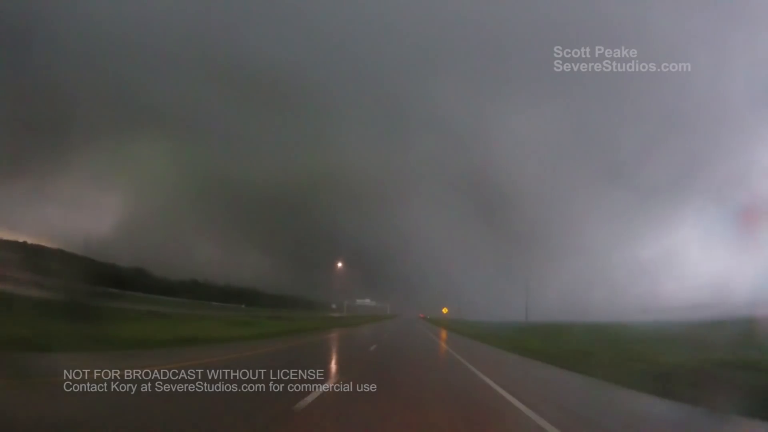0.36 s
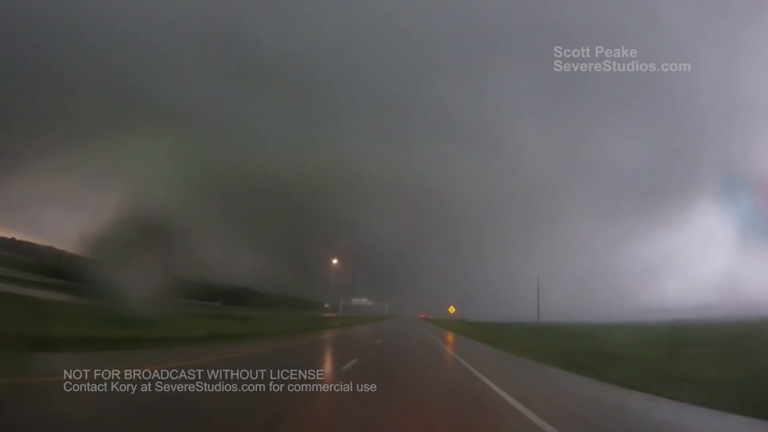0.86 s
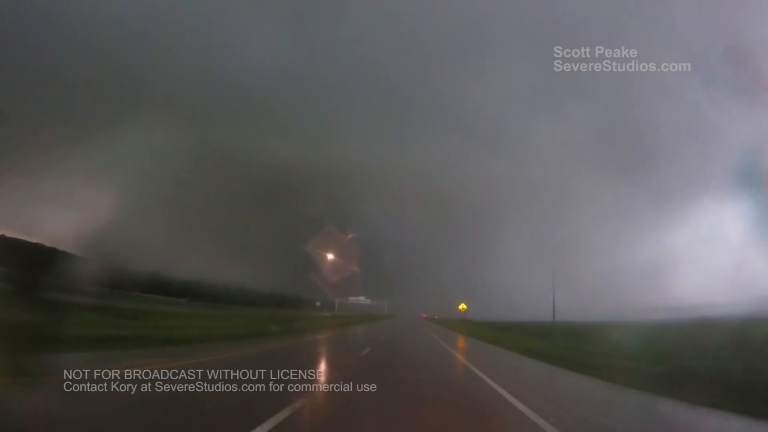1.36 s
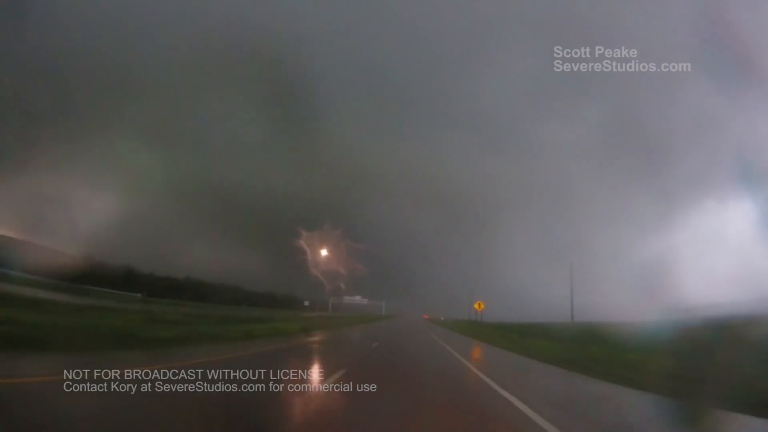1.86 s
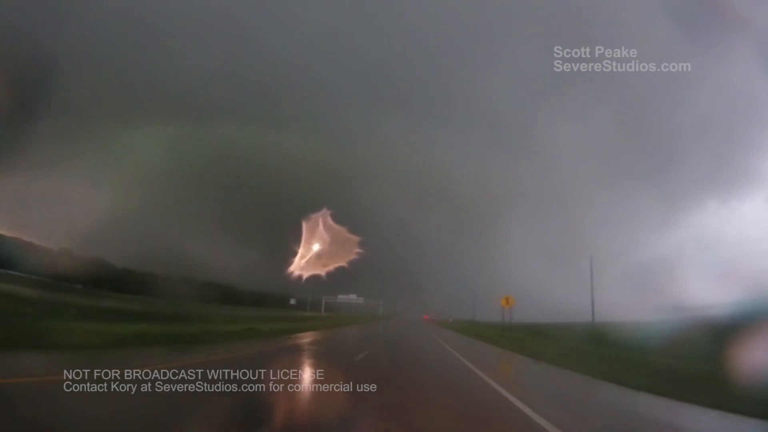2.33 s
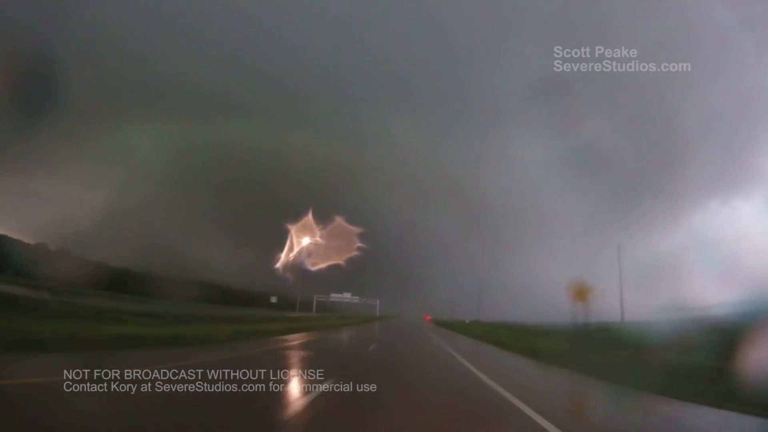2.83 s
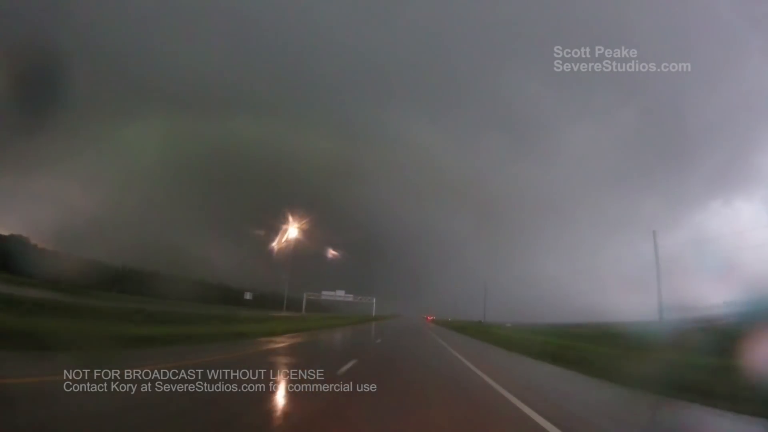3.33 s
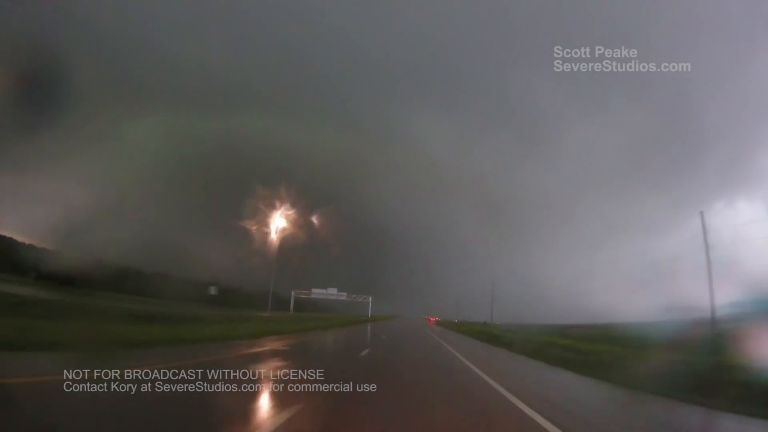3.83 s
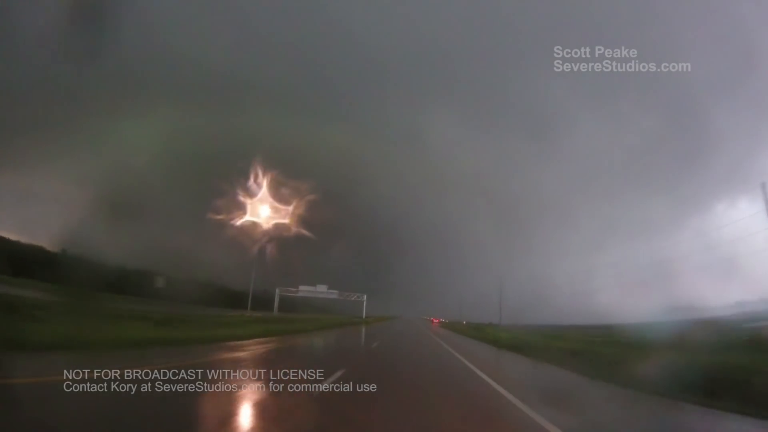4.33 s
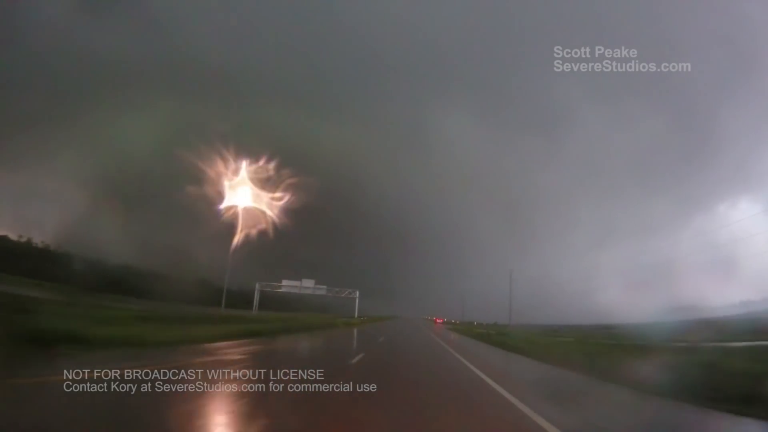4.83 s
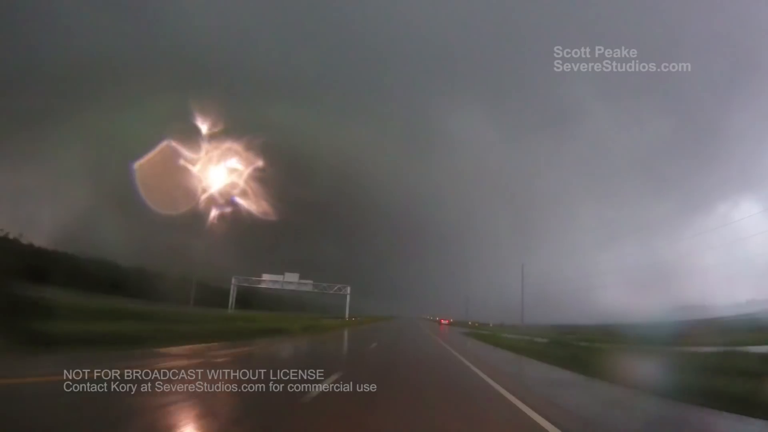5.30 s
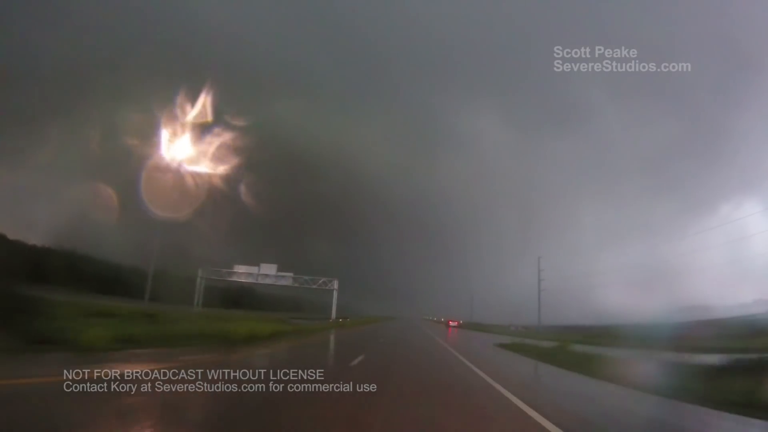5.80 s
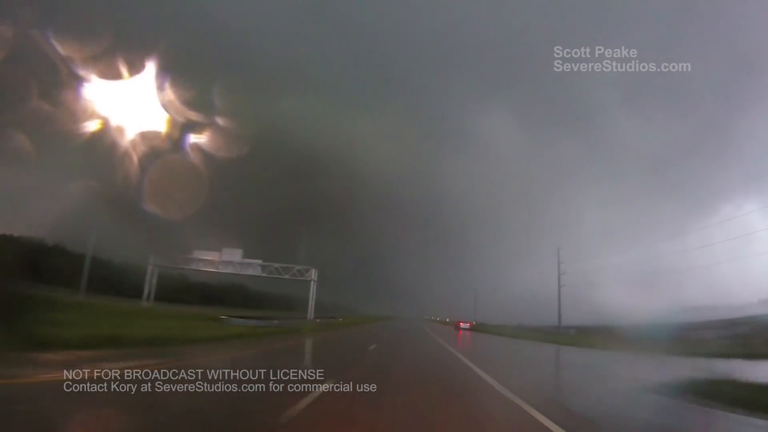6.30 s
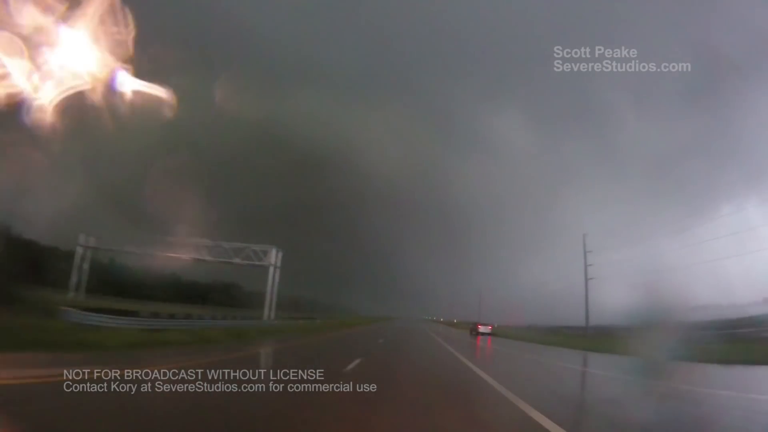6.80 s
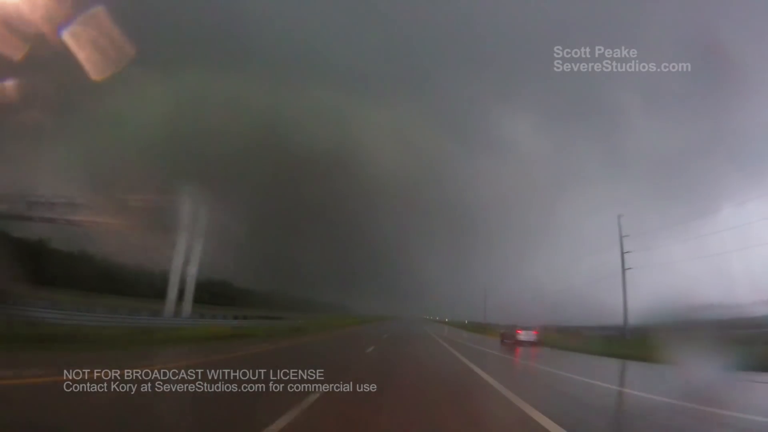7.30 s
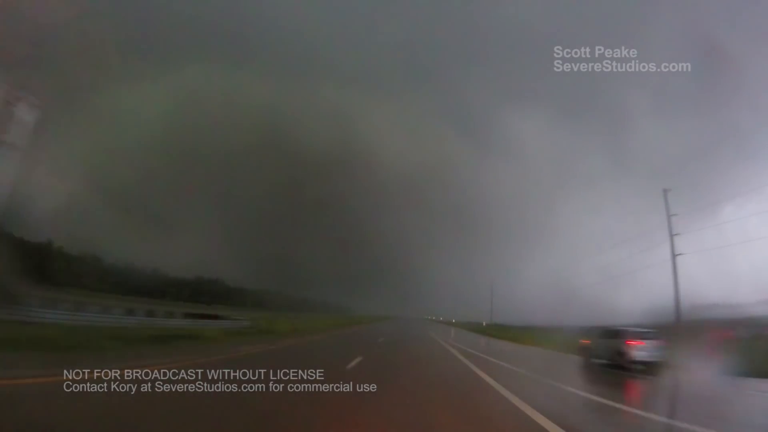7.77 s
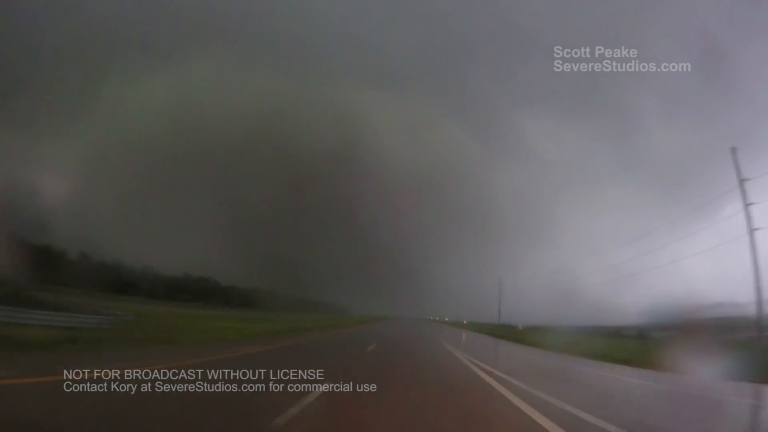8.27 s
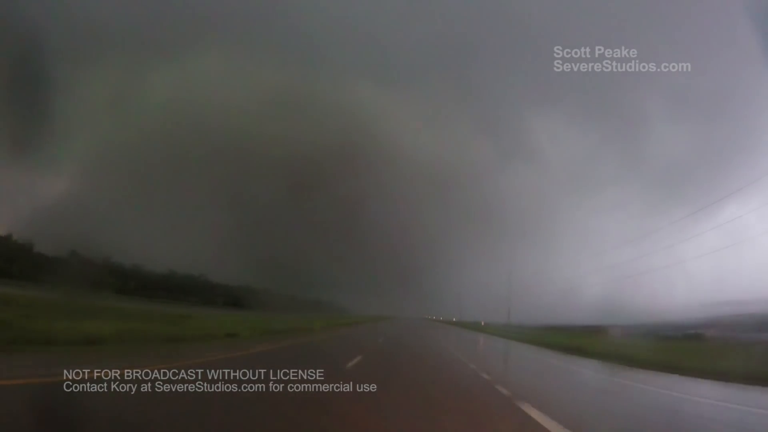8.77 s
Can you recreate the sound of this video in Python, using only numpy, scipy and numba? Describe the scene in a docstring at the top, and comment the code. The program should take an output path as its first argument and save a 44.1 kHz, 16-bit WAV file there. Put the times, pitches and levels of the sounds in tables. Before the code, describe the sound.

Strong wind buffets a microphone on a car driving into a storm, low and rumbling, while raindrops tick, knock and thud on the housing.

```python
"""Wind buffets a microphone in a housing on a car that drives into a storm on a wet road.
The wind is noise in seven pitch ranges that follow gusts, rumble and wetness, each by its own law,
over a thin hiss; eddies roar and rush past the port in bursts, small drops patter as chance clicks.
Large drops tick, knock and thud as short ringing tones, hard ones crack as single clicks, and short
low surges of the wind thump softly. A quick gain control holds the level down."""
import sys
import numpy as np
from scipy import signal
from scipy.fft import rfft, irfft, next_fast_len
from scipy.io import wavfile
from scipy.ndimage import uniform_filter1d
from numba import njit

SR = 44100
rng = np.random.default_rng(int(sys.argv[2]) if len(sys.argv) > 2 else 0)


def generate_wav(signal):
    """Clip the signal to [-1, 1] and save it as 16-bit WAV at the path in sys.argv[1]."""
    frames = np.transpose(np.atleast_2d(signal))
    scaled = np.clip(frames, -1, 1) * 32767
    pcm = np.round(scaled).astype(np.int16)
    wavfile.write(sys.argv[1], SR, pcm)


def convert_level_to_amplitude(level_db):
    """Map a level in decibels to its linear amplitude factor."""
    exponent = np.asarray(level_db, float) / 20
    return 10 ** exponent


N = 392042
T = np.arange(N) / SR


def level(x, db):
    """Scale a sound to an rms level in dB."""
    return x * convert_level_to_amplitude(db) / np.sqrt(np.mean(x ** 2))


def walk(rate):
    """A wandering curve of spread 1: random values, 'rate' per second, joined smoothly."""
    hold = int(SR / rate)
    steps = np.repeat(rng.standard_normal(N // 100), hold)[:N]
    smooth = uniform_filter1d(uniform_filter1d(steps, hold), hold)
    return level(smooth, 0)


def curve(table):
    """Join the points of a two-column table into a value for every sample."""
    t, value = np.transpose(table)
    return np.interp(T, t, value)


def ring(hz, t60, rise):
    """A soft push makes one tone ring and die away by 60 dB in t60 seconds; peak 1."""
    t = np.arange(1024) / SR
    fade = np.exp(-np.log(1000) * t / t60)
    push = 1 - np.exp(-(t / rise) ** 2)
    x = np.sin(2 * np.pi * hz * t) * fade * push
    return x / np.abs(x).max()


# how the housing colours the air noise inside it: (f/Hz, level/dB)
HOUSING_COLOUR = [(15, -29), (30, 0.5), (55, 3), (82, 6.5), (160, -2.5), (300, -11.5), (385, -21),
                  (600, -16), (1000, -40), (1500, -41), (2050, -40.5), (2550, -42.5), (2750, -48.5),
                  (3050, -53), (3700, -60.5), (4750, -66), (5700, -60.5), (7200, -61.5), (8300, -64.5),
                  (10000, -67), (11500, -74.5), (14000, -95)]


def housed(x, lo_hz, hi_hz, order=6):
    """The part of a broad noise between two pitches, ringing on in the housing; rms 1."""
    size = 2 * next_fast_len(N // 2 + 1)
    hz = np.arange(1, size // 2 + 2) * SR / size
    colour_hz, colour_db = np.transpose(HOUSING_COLOUR)
    colour = convert_level_to_amplitude(np.interp(np.log(hz), np.log(colour_hz), colour_db))
    low_cut = 1 + (lo_hz / hz) ** (2 * order)
    high_cut = 1 + (hz / hi_hz) ** (2 * order)
    band = 1 / np.sqrt(low_cut * high_cut)
    # folding the cepstrum makes the response causal: sharp start, tail after
    cepstrum = irfft(np.log(colour * band), size)
    cepstrum[1:size // 2] *= 2
    cepstrum[size // 2 + 1:] = 0
    response = np.exp(rfft(cepstrum))
    return level(irfft(rfft(x, size) * response, size)[:N], 0)


# gusts past the port, on the wind's own scale: (arrival t/s, level/dB, hold t/s)
GUST_LIST = [(-.05, -41, 0.23), (0.13, -41.5, 0.06), (0.247, -37, 0.055), (0.363, -41.5, 0.62),
             (0.716, -33.5, 0.12), (0.798, -35, 0.1), (0.9, -40, 0.12), (1.113, -41.5, 0.13),
             (1.256, -43, 0.14), (1.447, -42, 0.24), (1.622, -39, 0.11), (1.725, -42.5, 0.14),
             (1.806, -39.5, 0.24), (2.054, -41.5, 0.35), (2.274, -38.5, 0.13), (2.435, -36.5, 0.12),
             (2.58, -42, 0.15), (2.768, -46, 0.25), (2.997, -45.5, 0.12), (3.138, -49, 0.32),
             (3.453, -49, 0.19), (3.714, -41, 0.059), (3.823, -37.5, 0.11), (3.948, -41.5, 0.088),
             (4.094, -40.5, 0.11), (4.16, -38.5, 0.077), (4.341, -41, 0.11), (4.495, -43.5, 0.051),
             (4.612, -41.5, 0.3), (4.897, -44.5, 0.2), (5.018, -38.5, 0.059), (5.086, -43, 0.035),
             (5.198, -51.5, 0.2), (5.435, -44, 0.37), (5.613, -38.5, 0.13), (5.797, -38.5, 0.066),
             (5.86, -35, 0.094), (6.084, -42, 0.076), (6.32, -47.5, 0.071), (6.398, -41, 0.091),
             (6.501, -36, 0.043), (6.562, -34.5, 0.095), (6.678, -39, 0.055), (6.727, -49.5, 0.13),
             (6.85, -46, 0.11), (7.01, -47, .1), (7.15, -40, 0.12), (7.356, -45.5, 0.097),
             (7.506, -44, 0.16), (7.634, -47, 0.19), (7.749, -50, 0.34), (8.109, -49, 0.21),
             (8.247, -44, 0.16), (8.376, -39, 0.13), (8.551, -47.5, 0.14), (8.73, -49.5, 0.037)]


def wind():
    """Each gust rises fast, holds and fades; the strongest one at each moment rules."""
    rise_db_per_s, fade_db_per_s, lull_db = 449.5, 89, -58
    db = np.full(N, float(lull_db))
    for s, top_db, hold in GUST_LIST:
        rising = rise_db_per_s * (T - (s + 0.03))  # full strength 0.03 s after arrival
        fading = fade_db_per_s * (s + hold - T)
        db = np.maximum(db, top_db + np.minimum(0, np.minimum(rising, fading)))
    return db


# uneven strength of the low wind rumble, with sudden rises and dips: (t/s, level/dB)
RUMBLE_STRENGTH = [(0.03, -29.5), (0.13, -24.5), (0.17, -32), (0.59, -31), (1.06, -22.5), (1.08, -29.5),
                   (1.47, -20), (1.5, -28), (1.92, -21.5), (2.04, -27.5), (2.7, -20), (3.24, -29),
                   (3.68, -25), (3.78, -38), (3.88, -27), (4.72, -30), (4.79, -30), (4.84, -38),
                   (5.13, -21.5), (5.26, -30), (5.52, -29), (6.26, -29), (6.7, -26), (6.95, -32),
                   (7.2, -25), (7.32, -20.5), (7.38, -28), (7.51, -17.5), (7.78, -26), (8.82, -24.5),
                   (8.84, -34)]
# how much water the wind carries: (t/s, relative level/dB)
WATER = [(0, 4.5), (.6, 0), (1.2, 4.5), (1.9, 4), (2.6, 1.5), (3.2, 5.5), (3.9, -1), (4.6, 0), (5.3, -3),
         (5.9, -3), (6.6, -1), (7.2, -1.5), (7.9, -1), (8.5, -0.5), (8.89, 0)]
# the seven ranges of air noise, low to high, then the thin hiss:
# (base level/dB, dB per gust dB, dB per rumble dB, dB per wetness dB, own sway level/dB)
RANGE_LAWS = [(-22.5, 0.25, -0.1, 0.5, -0.14), (-27, 0.31, 0.87, 0, 0.5), (-35.5, 0.5, 0.3, 0.38, 1.44),
              (-46.5, 0.72, 0.19, 0.51, 0.33), (-51.5, 0.85, 0.08, 1.1, 0.86), (-65, 0.82, 0.12, 0.45, 0.3),
              (-73.5, 0.96, 0.24, 1.7, 1.5), (-76, 0.48, -0.4, -0.1, 0.6)]


def strengths():
    """Each range follows gusts, rumble and wetness by its own law and sways a little alone."""
    gust, rumble, wet = wind(), curve(RUMBLE_STRENGTH), curve(WATER)
    gust = gust - gust.mean() - 0.38 * walk(40)  # quick wavering of the wind, in dB
    rumble = rumble - rumble.mean()
    levels = []
    for base_db, per_gust, per_rumble, per_wet, sway_db in RANGE_LAWS:
        driven_db = base_db + per_gust * gust + per_rumble * rumble + per_wet * wet
        levels.append(driven_db + sway_db * walk(22.0))
    return levels


def bursts(rate, fade):
    """Eddies arrive suddenly by chance and die away; a log strength of mean 0, spread 1."""
    kicks = (rng.random(N) < rate / SR) * np.minimum(rng.exponential(size=N), 2.2)
    dying = signal.lfilter([1], [1, -np.exp(-1 / (fade * SR))], kicks)
    e = uniform_filter1d(np.log(dying + 0.34), size=40)
    return level(e - e.mean(), 0)


def patter(rate, spread_db):
    """Small drops: single clicks at chance moments, some larger than most but none very large."""
    hit = rng.random(N) < rate / SR
    size = np.minimum(rng.exponential(size=N), 3.0)
    return hit * rng.choice([-1., 1.], N) * convert_level_to_amplitude(spread_db * size)


def steadied(x):
    """The low buffet is held steadier than plain noise, as by a limiter: part of its swells goes."""
    evenness, even_s = 0.46, 0.05  # strength of the evening out, and the time it averages over
    power = uniform_filter1d(uniform_filter1d(x ** 2, int(even_s * SR)), int(even_s * SR / 2))
    return level(x / (power + 0.067) ** (evenness / 2), 0)


# upper edges of buffet, thrum, roar, rush, bright rush and sizzle: (f/Hz)
UPPER_EDGES = [145, 365, 920, 1750, 3050, 4800]
# thin narrow hiss under the wind noise: (lower f/Hz, upper f/Hz)
HISS_BAND = (5800, 7000)


def airflow():
    """Seven ranges of air noise and a thin hiss; all but buffet and hiss share the eddies' bursts."""
    buffet_db, thrum_db, roar_db, rush_db, bright_db, sizzle_db, spray_db, hiss_db = strengths()
    eddies, ripples = bursts(rate=26.0, fade=0.0046), walk(160.)
    air = rng.standard_normal((4, N))
    a, b, c, d, e, f = UPPER_EDGES
    out = convert_level_to_amplitude(buffet_db) * steadied(housed(air[0], 16.9, a))
    out += convert_level_to_amplitude(thrum_db) * housed(air[1] * convert_level_to_amplitude(0.57 * eddies), a, b)
    out += convert_level_to_amplitude(roar_db) * housed(air[1] * convert_level_to_amplitude(0.2 * eddies + 0.16 * ripples), b, c)
    # the same small drops sound in the rush and in the spray
    drops = level(patter(rate=830.0, spread_db=9.0), 0)
    stream = air[2] * convert_level_to_amplitude(1.2 * eddies + 0.5 * ripples) + convert_level_to_amplitude(-5.0) * drops
    out += convert_level_to_amplitude(rush_db) * housed(stream, c, d)
    out += convert_level_to_amplitude(bright_db) * housed(stream, d, e)
    out += convert_level_to_amplitude(sizzle_db) * housed(stream, e, f)
    spray = air[3] * convert_level_to_amplitude(0.46 * eddies + 1.2 * ripples) + convert_level_to_amplitude(-11.5) * drops
    out += convert_level_to_amplitude(spray_db) * housed(spray, f, 16000.)
    out += convert_level_to_amplitude(hiss_db) * housed(rng.standard_normal(N), *HISS_BAND, order=3)
    return out


def snaps(count):
    """Bright snaps of drops: tiny bursts of high noise that swell and die at once; peak 1."""
    t = np.arange(1024) / SR
    crackle = rng.standard_normal((count, 1024)) * t * np.exp(-t / 0.0004)
    band = signal.butter(3, [4300, 11000], "band", fs=SR, output="sos")
    bright = signal.sosfilt(band, crackle)
    return bright / np.abs(bright).max(axis=1, keepdims=True)


# tones of the housing wall when a drop knocks it: (f/Hz, relative level/dB, 60 dB fade t/s)
WALL_TONES = [(1510, 6, 0.0053), (2100, 12.5, 0.0045), (2690, -3.5, 0.0042)]
# tone of the panel under the drop: (f/Hz, 60 dB fade t/s)
PANEL_TONE = (675, 0.016)
# large drops: (t/s, tick peak level/dB, tick f/Hz, knock peak level/dB, thud peak level/dB)
LARGE_DROPS = [(.024, -37, 8900, -49, -34), (0.4444, -47, 6500, -49, -39), (.4973, -34, 6440, -35, -25.5),
               (0.555, -53, 6700, -39.5, -36), (.5987, -48, 9700, -53, -38), (.61, -45.5, 9100, -35, -27),
               (.629, -53, 9500, -40, -29), (0.6736, -26, 7040, -31, -30), (0.6815, -41, 7000, -38, -46),
               (0.698, -46, 6700, -45, -38), (.7048, -44, 6000, -46, -39), (.7054, -42, 9800, -50, -45),
               (.73, -52, 6680, -50, -33), (.7368, -58, 7000, -39, -23), (.7537, -56, 7000, -26, -29),
               (.914, -52, 6000, -48, -41), (.96, -51, 8800, -52, -42), (0.9496, -36, 6170, -43, -41),
               (1.0907, -48, 6040, -44, -43), (1.231, -51, 5890, -42, -37), (1.4656, -59, 6500, -37, -26),
               (1.5045, -54, 6500, -36, -40), (1.7111, -57, 6500, -37, -31),
               (1.7637, -43.5, 6435, -45.5, -40), (1.8134, -52, 5570, -37, -18.5),
               (1.8604, -56, 5550, -41, -44), (2.2145, -51, 7500, -45, -40),
               (2.2607, -48, 6203, -31, -27.5), (2.268, -43.5, 7000, -40, -25),
               (2.4633, -55, 6800, -35, -30), (2.5795, -48, 7200, -31, -23),
               (2.5204, -65.5, 5520, -33, -33.5), (2.8026, -64, 6500, -32, -35),
               (2.9443, -61, 6500, -31, -32), (3.6169, -36.5, 7000, -40, -35),
               (3.8397, -57, 6380, -45, -43), (3.8642, -55, 6500, -32, -32), (3.8946, -58, 6500, -31, -45),
               (4.0961, -65, 5650, -38, -21.5), (4.1326, -69, 6470, -43, -28),
               (4.2582, -53, 8000, -51, -29), (4.3146, -59, 5600, -57, -33), (4.613, -58, 6500, -39, -29.5),
               (4.7932, -66, 5370, -26.5, -47), (4.994, -46, 7900, -35, -62), (5.0764, -29, 6540, -35, -49),
               (5.1008, -60, 5680, -37, -43), (5.263, -62, 7200, -58, -47), (5.5002, -60, 5900, -48, -46),
               (5.7663, -65, 5840, -33, -18.5), (5.917, -52, 6500, -35, -33), (6.0023, -63, 6300, -48, -33),
               (6.114, -62, 6500, -47, -30), (6.1734, -52, 6500, -35.5, -29),
               (6.4093, -61.5, 5730, -54, -33), (6.4278, -52, 6620, -42, -24), (6.44, -49, 4020, -40, -35),
               (6.4872, -64, 6500, -48, -30), (6.5336, -60, 6300, -40, -35), (6.594, -55, 6000, -33, -38),
               (6.6164, -62, 6500, -27, -36), (6.7056, -55, 5800, -30.5, -37),
               (6.8063, -58, 8500, -55, -45), (6.83, -59, 7500, -52, -45), (7.1702, -63, 6310, -40, -32),
               (7.7164, -70, 6400, -51, -26), (8.14, -70, 5635, -45, -23.5), (8.332, -56, 6000, -52, -42.5),
               (8.41, -57, 6380, -34.5, -22.5), (8.453, -56, 6009, -43, -34),
               (8.5134, -38.5, 6700, -41, -30), (8.546, -52, 7900, -49, -38)]


def large_drops():
    """Each drop snaps, ticks on the port's cover, knocks the housing wall and thuds on the panel."""
    out = np.zeros(N + 1024)
    knock = sum(convert_level_to_amplitude(db) * ring(hz, t60, rise=0.00079) for hz, db, t60 in WALL_TONES)
    knock = knock / np.abs(knock).max()
    thud = ring(*PANEL_TONE, rise=0.00099)
    for (s, tick_db, tick_hz, knock_db, thud_db), snap in zip(LARGE_DROPS, snaps(len(LARGE_DROPS))):
        i = int((s + 0.0006) * SR)  # the sound starts 0.0006 s after the listed time
        hit = convert_level_to_amplitude(tick_db) * ring(tick_hz, t60=0.002, rise=0.0003)
        hit += convert_level_to_amplitude(tick_db - 7) * snap  # the snap peaks 7 dB under the tick
        hit += convert_level_to_amplitude(knock_db) * knock + convert_level_to_amplitude(thud_db) * thud
        out[i:i + 1024] += hit
    return out[:N]


# hard drops that crack as one solid click: (t/s of the peak, peak level/dB, treble lift level/dB)
HARD_DROPS = [(0.6748, -30, 8), (0.863, -28, -3), (2.2615, -35, 2), (2.5812, -21, -4), (5.286, -30.5, 11),
              (5.768, -29, -16), (6.8032, -18, -1.5), (7.09, -28.5, 5), (7.1342, -28.5, -10)]
# colour of that click before its treble lift: (f/Hz, level/dB)
CLICK_COLOUR = [(600, -27), (1300, -16), (2100, 5.5), (3000, -5.5), (4000, -16.5), (5000, -21), (6800, -17),
                (8500, -24), (10500, -33), (12500, -46), (15000, -65)]


def cracks():
    """Hard drops: one very short click each, all pitches at once, each with its own brightness."""
    out = np.zeros(N + 256)
    hz = np.arange(1, 130) * SR / 256
    known_hz, known_db = np.transpose(CLICK_COLOUR)
    colour_db = np.interp(np.log(hz), np.log(known_hz), known_db)
    treble = 1 / (1 + (4200 / hz) ** 4)  # share of the lift: half at 4200 Hz, nearly all far above
    for s, db, lift_db in HARD_DROPS:
        # roll the click's peak to the middle of its 256 samples
        click = np.roll(irfft(convert_level_to_amplitude(colour_db + lift_db * treble)), 128) * np.hanning(256)
        i = int(s * SR) - 128
        out[i:i + 256] += convert_level_to_amplitude(db) * click / np.abs(click).max()
    return out[:N]


# short low surges of the wind: (t/s, peak level/dB, f/Hz)
LOW_SURGES = [(2.521, -14, 232), (4.772, -11, 173), (4.79, -11, 194), (5.457, -19.5, 193.5),
              (5.794, -19.5, 179), (7.272, -18, 214), (7.309, -12.5, 259), (7.52, -14, 199),
              (8.137, -14.5, 269), (8.468, -18.5, 238)]


def surges():
    """Short low surges of the wind: each a soft low thump, one tone that soon dies away."""
    out = np.zeros(N + 1024)
    for s, db, hz in LOW_SURGES:
        i = int(s * SR)
        out[i:i + 1024] += convert_level_to_amplitude(db) * ring(hz, t60=0.03, rise=0.0033)
    return out[:N]


def scene():
    """Wind, spray, drops and low surges at one microphone."""
    return (airflow() + large_drops() + cracks() + surges())[None]


@njit
def follow(x, attack, release):
    """Loudness curve that jumps up fast and sinks slowly."""
    e, out = .1, np.empty(len(x))
    for i in range(len(x)):
        a = abs(x[i])
        e += (a - e) * (attack if a > e else release)
        out[i] = e
    return out


def roll_off(x):
    """The treble ends steeply here."""
    return signal.sosfilt(signal.butter(12, 14300, fs=SR, output="sos"), x)


def record(dry):
    """A quick gain control squeezes swells above its threshold; the input stage rounds off peaks."""
    attack_s, release_s, threshold_db = 0.00076, 0.029, -23.0
    squeeze = 0.45  # share of the dB above the threshold that is taken away
    ceiling = 0.41  # peaks are rounded off towards this
    loudness = follow(dry[0], 1 / (attack_s * SR), 1 / (release_s * SR))
    loudness = uniform_filter1d(loudness, size=120)
    gain = convert_level_to_amplitude(3.0) * np.minimum(convert_level_to_amplitude(threshold_db) / loudness, 1) ** squeeze
    mix = ceiling * np.tanh(1.08 * dry * gain / ceiling)
    return roll_off(mix)


dry = scene()
out = record(dry)
generate_wav(out)
```